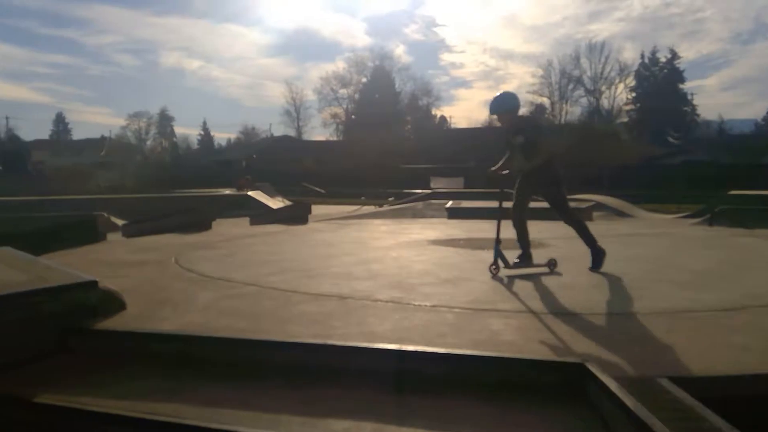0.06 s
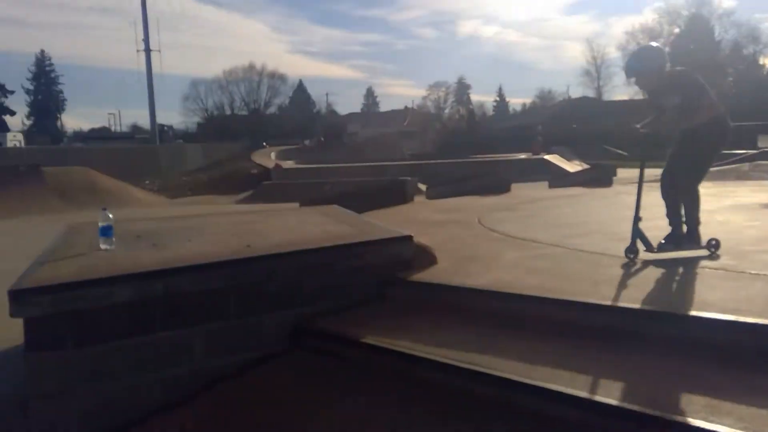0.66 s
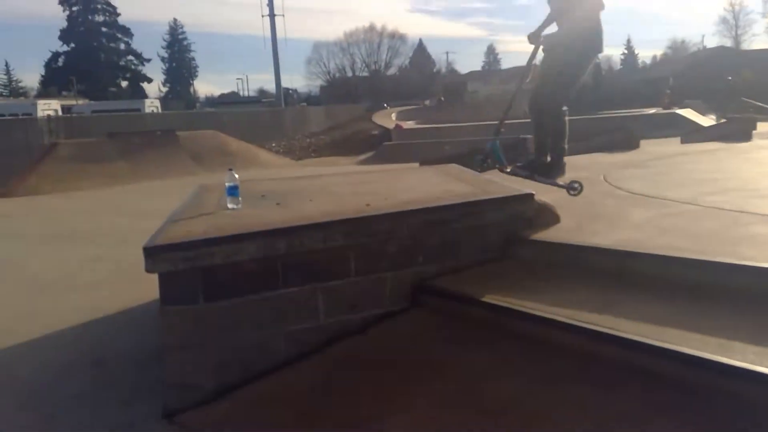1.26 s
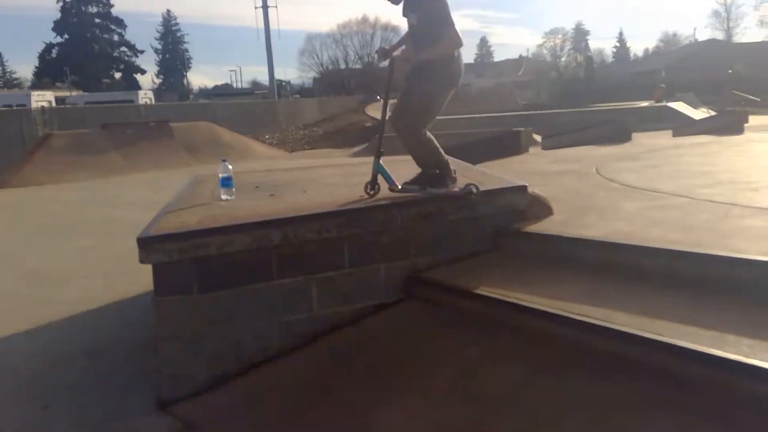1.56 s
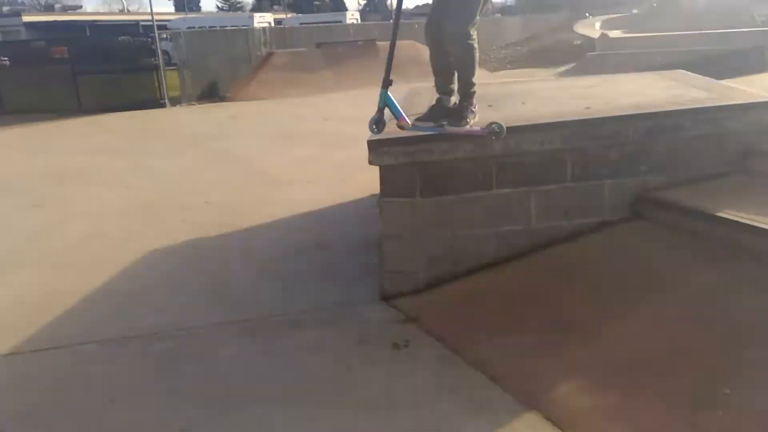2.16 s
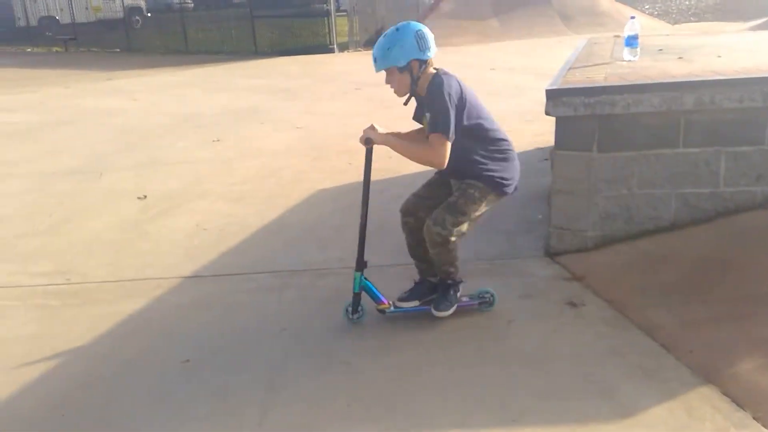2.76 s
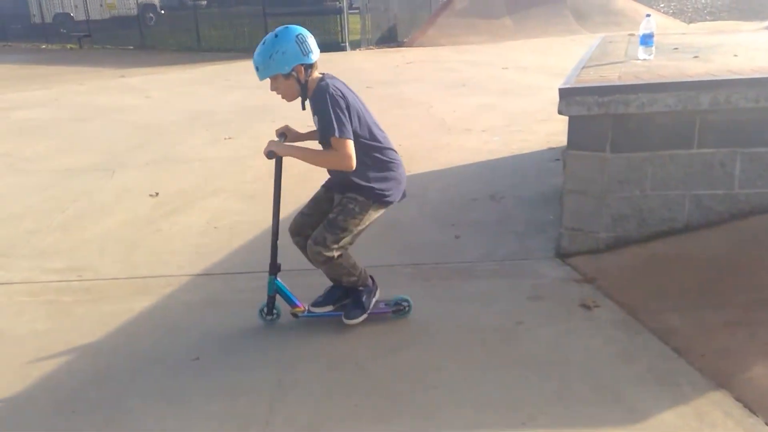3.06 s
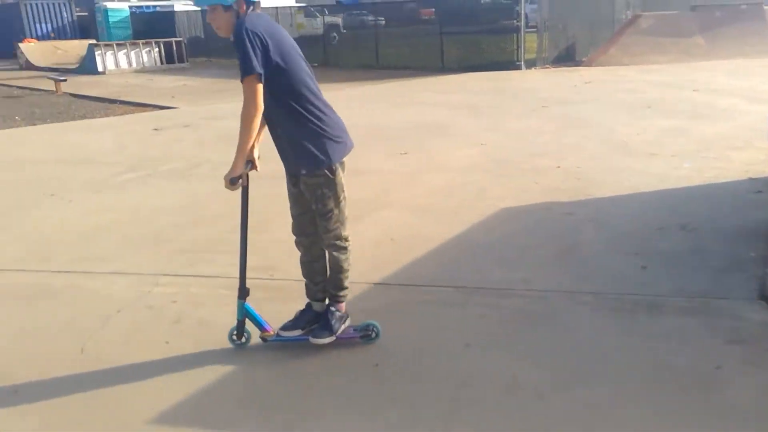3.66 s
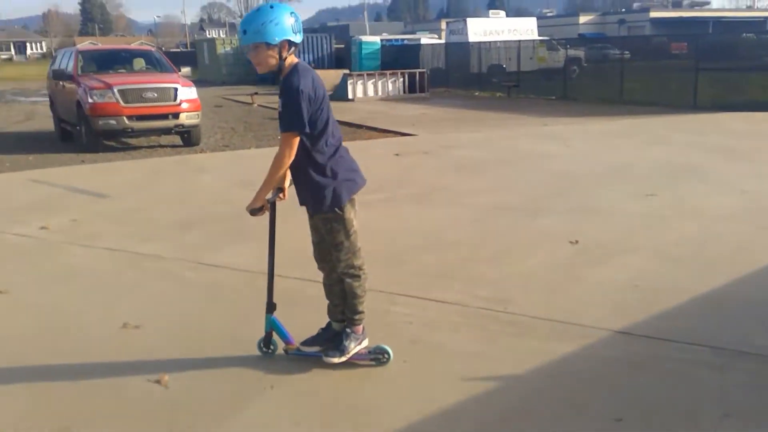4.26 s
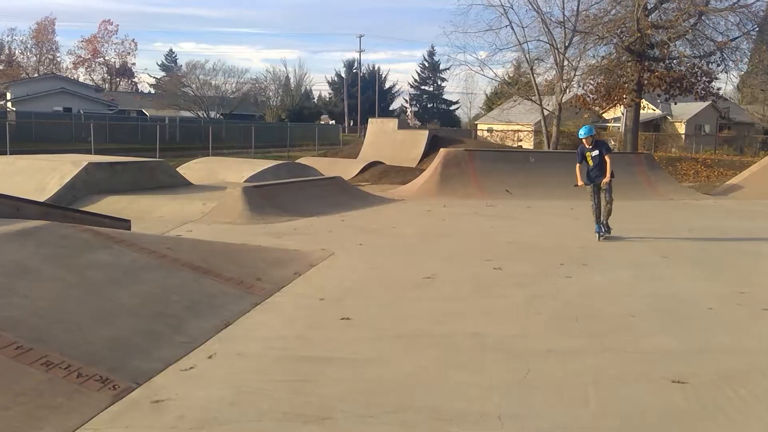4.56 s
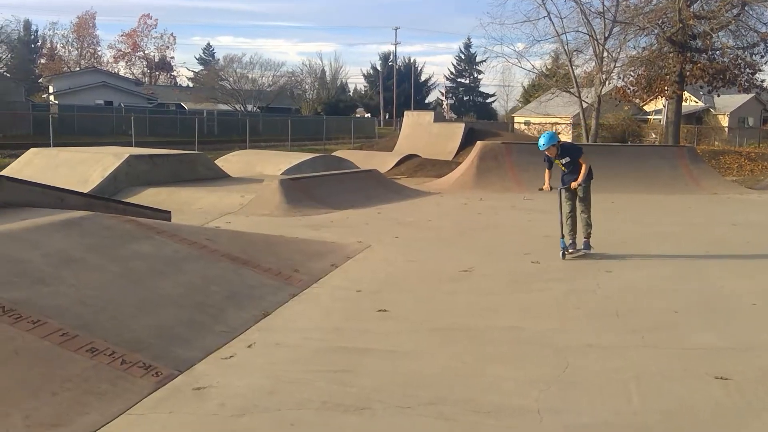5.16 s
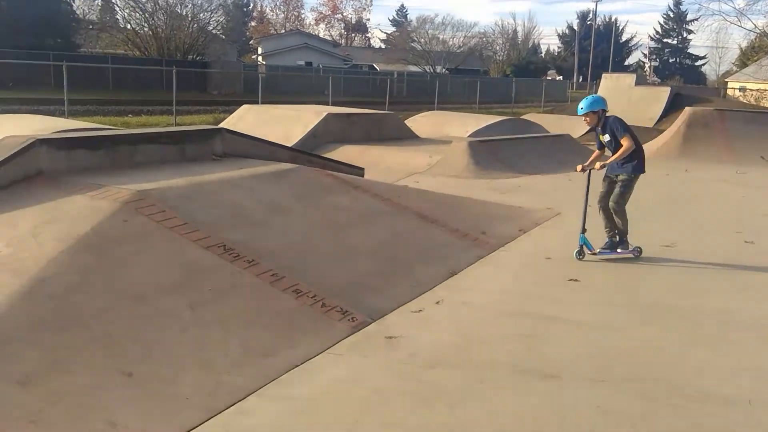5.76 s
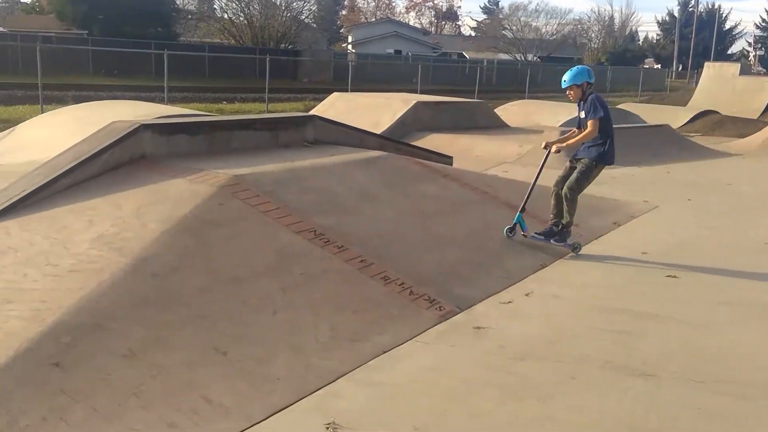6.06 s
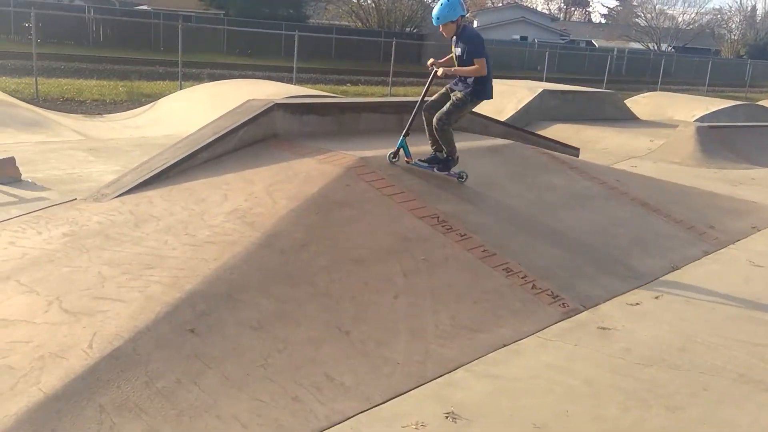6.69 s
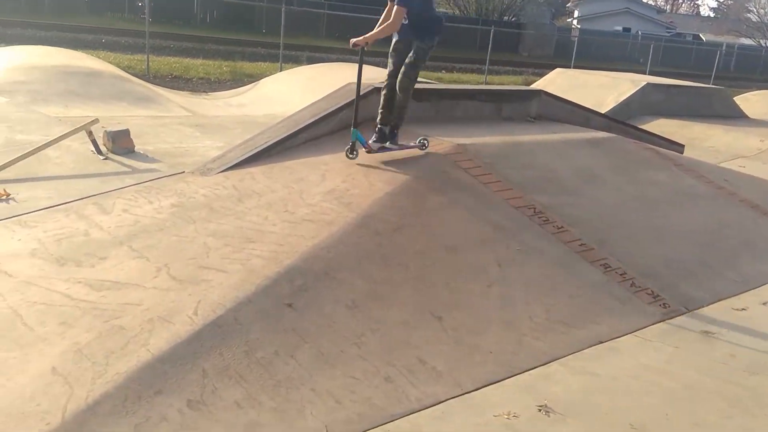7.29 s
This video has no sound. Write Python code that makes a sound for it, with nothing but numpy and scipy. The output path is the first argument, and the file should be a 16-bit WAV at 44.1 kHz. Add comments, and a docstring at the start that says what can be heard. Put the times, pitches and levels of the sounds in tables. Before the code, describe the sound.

A kick scooter rolls over concrete, knocks onto a ledge and grinds along it with a brief raspy squeal. It lands hard, its metal frame ringing, and rolls off. After a short silence it comes back, clacks up a bank and whirrs as it spins in the air. A few faint birds, a low rumble and a thin high whine lie behind, picked up by a phone microphone with short outdoor echoes.

```python
"""A kick scooter hops onto a concrete ledge, grinds along it, lands hard and rolls off. Then the sound breaks
off into a short silence and fades back in as the scooter clacks up a bank and is spun in the air. Wheels thud
under the rider's weight, bare metal clacks and rings, and sliding shakes the deck (the board you stand on).
Ramps and fences echo the scooter and a few faint birds. Behind it all lie a low outdoor rumble, the roar of a
distant town and a thin, high whine."""
import sys
import numpy as np
from scipy import signal
from scipy.fft import rfft, irfft, next_fast_len
from scipy.io import wavfile
from scipy.ndimage import uniform_filter1d, map_coordinates

SR = 44100
rng = np.random.default_rng(int(sys.argv[2]) if len(sys.argv) > 2 else 0)


def generate_wav(signal):
    """Clip the signal to [-1, 1] and save it as 16-bit WAV at the path in sys.argv[1]."""
    frames = np.transpose(np.atleast_2d(signal))
    scaled = np.clip(frames, -1, 1) * 32767
    pcm = np.round(scaled).astype(np.int16)
    wavfile.write(sys.argv[1], SR, pcm)


N = 323253
TIME = np.arange(N) / SR
SIDES = np.array([[1], [-1]])  # left, right
PAUSE_START_S, PAUSE_END_S = 4.403, 4.799  # the silence between the two runs


def amp(db):
    """Turns decibels into a number to multiply by."""
    return 10 ** (np.asarray(db) / 20)


def unit_level(x):
    """Scales x to an average (rms) level of 1."""
    return x / np.sqrt(np.mean(x ** 2) + 1e-20)


def at_pitch(points, hz):
    """Looks up a value between the pitches of a table."""
    pitches, values = np.transpose(points)
    return np.interp(np.log(hz + 1), np.log(pitches), values)


def band(x, low_hz, high_hz, order=3):
    """Keeps the sound between two pitches."""
    return signal.sosfilt(signal.butter(order, [low_hz, high_hz], "band", fs=SR, output="sos"), x)


def coloured(x, points):
    """Makes each pitch louder or softer, as a table says."""
    size = next_fast_len(N)
    gain = amp(at_pitch(points, np.fft.rfftfreq(size, 1 / SR)))
    return irfft(rfft(x, size) * gain, size)[:, :N]


def drift(size, rate_hz):
    """A smooth random wobble."""
    knots = rng.standard_normal(4096)
    return unit_level(map_coordinates(knots, [np.arange(size) * rate_hz / SR], order=2, mode="wrap"))


def burst(t, rise_s, decay_s):
    """The loudness of one hit: quickly up, then dying away."""
    return (1 - np.exp(-(t / rise_s) ** 2)) * np.exp(-t / decay_s)


def add(mix, start_s, sound):
    """Mixes in a stereo sound."""
    part = mix[:, round(start_s * SR):][:, :sound.shape[1]]
    part += sound[:, :part.shape[1]]


def place(x, left_db, shadow_hz=950, scatter_db=-11):
    """Puts a sound left or right: the far side of the phone hears it duller and later."""
    size = next_fast_len(len(x) + 192)
    hz = np.fft.rfftfreq(size, 1 / SR)
    treble = hz ** 2 / (hz ** 2 + shadow_hz ** 2)
    gain = amp(SIDES * left_db / 2 * treble)
    gain /= np.sqrt(np.mean(gain ** 2, 0))
    detour = 1 + 1.5 / (1 + (hz / 700) ** 2)  # low sounds bend round the phone, a longer way
    lag_samples = 16 - SIDES * np.clip(1.55 * left_db, -4, 4) / 2 * detour
    hand_scatter = amp(scatter_db) * treble * rfft(rng.standard_normal((2, 100)) / 10, size)
    paths = (1 + hand_scatter) * np.exp(-2j * np.pi * hz * lag_samples / SR)
    return irfft(rfft(x, size) * gain * paths, size)


# The tone of the rumble and of the roar: pitch_hz, level_db
RUMBLE_TONE = [(12, -38), (20, -9), (38, -1), (65, 2.5), (97, -6.5), (124, -4), (150, -11.5), (189, -14),
               (300, -24), (390, -54), (660, -120)]
ROAR_TONE = [(120, -12), (250, -3), (400, -0.5), (650, 1.5), (1000, -5), (1700, -8), (2500, -15),
             (4500, -25.5), (8000, -28.5), (15000, -25)]
# Stretches of rolling: start_s, end_s, lift_db
ROLLS = [(0.51, 0.785, 8), (1.272, 2.3, 15), (2.732, 2.823, 10), (4.9, 7.33, 6), (5.2, 5.355, 9.5),
         (5.72, 5.98, 11.5), (6.734, 7.12, 19)]
def air_and_rolling(rumble_db=-59, roar_db=-68, rise_db_per_s=110, fall_db_per_s=63):
    """A lumpy rumble and the wider roar of town and wheels; both swell while the wheels roll."""
    lift_db = np.zeros(N)
    for start_s, end_s, db in ROLLS:
        before_db = rise_db_per_s * np.maximum(start_s - TIME, 0)
        after_db = fall_db_per_s * np.maximum(TIME - end_s, 0)
        lift_db = np.maximum(lift_db, db - before_db - after_db)
    rumble_middle, rumble_side, roar_middle, roar_side = rng.standard_normal((4, N))
    rumble = unit_level(coloured(rumble_middle + 0.4 * SIDES * rumble_side, RUMBLE_TONE))
    rumble *= amp(rumble_db + 0.27 * lift_db + 1.6 * drift(N, 9.3))
    roar = unit_level(coloured(roar_middle + 0.67 * SIDES * roar_side, ROAR_TONE))
    roar *= amp(roar_db + 0.88 * drift(N, 40))
    wheels = band(roar[:, ::-1], 200, 3000, order=1) * np.sqrt(amp(lift_db) ** 2 - 1)
    fade_in_db = 71.5 * np.minimum(TIME - 5.026, 0) * (TIME > PAUSE_START_S + .1)  # after the pause
    return (rumble + roar + wheels) * amp(fade_in_db)


# How loud the whine is: time_s, level_db
WHINE_LEVELS = [(0, -93.5), (2.9, -91.5), (3.4, -76), (4.4, -74.5), (4.8, -105), (6.6, -84.5), (7.33, -89)]
def whine(rest_hz=10980, top_hz=11375, slide_hz_per_s=760, peaks_s=(3.15, 4.6, 6.75)):
    """A faint high tone that now and then climbs and slides back."""
    from_peak_s = np.min([abs(TIME - s) for s in peaks_s], 0)
    hz = np.maximum(top_hz - slide_hz_per_s * from_peak_s, rest_hz)
    level_db = np.interp(TIME, *np.transpose(WHINE_LEVELS))
    return np.sqrt(2) * amp(level_db) * np.sin(2 * np.pi * np.cumsum(hz) / SR)


# The scooter's path (below zero is to the right): time_s, left_db
PATH = [(.5, -6), (1.75, -1), (1.9, -19), (2.15, -18.5), (2.3, -14.5), (2.8, -5.5), (4.3, 2.5), (5.3, -1),
        (5.8, -13), (6.2, -4), (6.68, 17), (6.85, 14), (7.2, 20.5)]
def scooter_side(time_s):
    """How far to the left the scooter sounds."""
    return np.interp(time_s, *np.transpose(PATH))


# The notes of the deck pressed on the ledge: pitch_hz, width_hz, level_db
DECK_NOTES = [(600, 150, 6), (1126, 51, -11.5), (1570, 390, -11.5), (1690, 420, -12.5), (2020, 130, -9.5),
              (2720, 230, -13.5), (3120, 340, -16), (3666, 350, -19.5), (4220, 200, -19),
              (5504, 190, -22.5), (7100, 370, -22), (8320, 240, -21), (9270, 120, -17.5), (10280, 150, -19),
              (12700, 440, -22)]
def through_deck(x, direct_db=-28):
    """The deck boosts its own notes and lets a little sound straight through."""
    hz = np.fft.rfftfreq(len(x), 1 / SR)
    notes = sum(amp(db) / (1 + 2j * (hz - pitch) / width) for pitch, width, db in DECK_NOTES)
    return irfft(rfft(x) * (amp(direct_db) + notes), len(x))


# The borders of a hit's five ranges (thud, knock, clank, crack, fizz): edge_hz
HIT_EDGES = [90, 300, 800, 2500, 6000, 15500]
def hit(start_s, levels_db, notes_hz, decay_s, clank_share, rise_s=0.0014, lead_s=.02):
    """One impact: three dying notes under a hollow clatter that dies faster in the treble."""
    clock = np.arange(SR // 5) / SR - lead_s
    t = np.maximum(clock, 0)
    level_scale = np.sqrt(.02 * SR / len(t))  # levels count as if the hit lasted 20 ms
    squeeze = amp(-18) * np.exp(-abs(clock) / .0027)  # the tyre gives before the hard contact
    chatter = amp(-26) * burst(t, rise_s, 0.017)  # loose steering parts and bearings
    rises_s = [2 * rise_s, rise_s, rise_s, 0.00044, 0.00044]
    decays_s = decay_s * np.array([1, 1.3, 1, 0.94, 0.94])
    note_shares = [0.94, 0.741, clank_share]
    out = np.zeros(len(t))
    for k, level_db in enumerate(levels_db):
        shape = squeeze + burst(t, rises_s[k], decays_s[k])
        clatter = rng.standard_normal(len(t)) * (shape + chatter)
        if k >= 2:  # clank, crack and fizz sound hollow
            clatter = through_deck(clatter, direct_db=-15.5 if k == 2 else -23)
        part = unit_level(band(clatter, *HIT_EDGES[k:k + 2], order=5 if k >= 2 else 3))
        if k < 3:  # thud, knock and clank each hold a note
            note = unit_level(shape * np.sin(2 * np.pi * notes_hz[k] * clock))
            noise = unit_level(part - note * np.mean(part * note))
            part = np.sqrt(note_shares[k]) * note + np.sqrt(1 - note_shares[k]) * noise
        out += amp(level_db) * level_scale * unit_level(part)
    return start_s - lead_s, place(out, scooter_side(start_s))


# Deck and fork clacking: start_s, strength_db, hardness_db, clank_hz, decay_s,
# clank_share (0 is all noise, 1 is a clear note)
CLACKS = [(0.524, -30.5, -14.5, 1765, 0.0012, 0), (1.524, -36.5, -13, 1026, 0.00375, 0.87),
          (1.584, -45, 8, 1850, 0.0082, 0.21), (2.082, -42, -3.5, 2210, .009, .8),
          (2.1516, -36, 2.5, 2070, .013, .55), (2.2377, -17.5, 2, 1851, 0.0046, .3),
          (5.8001, -33.5, 10, 1907, 0.0089, 0.96), (6.27, -64, 10.5, 1847, 0.0059, 0.22),
          (7.071, -42.5, 12, 2430, 0.0074, 0.51), (7.174, -36.5, 2.5, 968, 0.0107, 0.75)]
def metal_clack(start_s, strength_db, hardness_db, clank_hz, decay_s, clank_share):
    """Bare metal hits with little weight behind it; harder hits have more crack and fizz."""
    tone_db = np.array([-20, -11, 0, -8, -17.5]) + hardness_db * np.array([0, 0, 0, 0.34, 1.4])
    return hit(start_s, strength_db + tone_db, (230, 697, clank_hz), decay_s, clank_share)


# Dull knocks and thumps (wheel strikes, shoe thumps and judders in the grind):
# start_s, strength_db, weight_db, hardness_db, thud_hz, knock_hz, clank_hz, decay_s
KNOCKS = [(0.717, -54, 11, -31, 137, 590, 823, 0.069), (0.9409, -59.5, 38.5, 7.5, 207, 349, 2370, .007),
          (1.236, -24.5, -16, 1.5, 227, 594.3, 1540, 0.0024),
          (1.2449, -32.5, -2.5, 4, 184, 623, 1690, .0094), (1.267, -30.5, -10, -5.5, 139, 604, 1170, .0099),
          (1.445, -17, -6.5, 3, 138.3, 603, 1700, 0.0047), (1.4702, -19, 0, 10.5, 233, 590, 896.7, 0.0024),
          (1.6507, -42.5, -3, -19, 266, 645.4, 2121, 0.026), (1.741, -41, -9, -19, 270, 593.8, 2083, .012),
          (1.7565, -30.5, -13.5, -42, 281, 593.2, 2097, 0.0057),
          (1.8036, -25.5, -14, -11, 208, 601, 1536, 0.0075),
          (2.2388, -32, -12, 5.5, 185, 767.8, 1000, .009), (2.678, -38.5, 9.5, 6.5, 187, 493, 1594, 0.023),
          (2.6959, -19, 9.5, -7.5, 227, 343, 806, 0.0044),
          (2.7012, -16.5, 5.5, 12.5, 166.1, 484, 1550, 0.00724),
          (2.7267, -27.5, 6.5, 6.5, 150, 457, 928, 0.0059),
          (2.7633, -35, -6, -5.5, 144.7, 488.4, 1127, .005),
          (4.3024, -31, 0.5, -23, 244, 560, 1118, 0.00471), (5.122, -58.5, 7, -7, 281, 335.6, 886, 0.013),
          (5.322, -56.5, 10, 4, 131, 775, 820, 0.0059),
          (6.1583, -16.5, -0.5, 0.5, 247, 479.5, 1128, 0.00325),
          (6.6874, -22, -3, -4.5, 283, 508.7, 1125, 0.0096), (6.7917, -13, -10, -6, 300, 401, 1010, 0.0025),
          (6.818, -32, 1, -7, 223.4, 358.6, 803, 0.029), (6.957, -32.5, 15, 10, 210, 518, 1575, 0.01)]
def dull_knock(start_s, strength_db, weight_db, hardness_db, thud_hz, knock_hz, clank_hz, decay_s):
    """The rider's weight feeds the thud; a hard contact feeds the treble."""
    tone_db = np.array([-9, -2, -3, -14, -27]) + hardness_db * np.array([0, 0, 0.55, 1, 1.4])
    tone_db[0] += weight_db
    return hit(start_s, strength_db + tone_db, (thud_hz, knock_hz, clank_hz), decay_s, clank_share=0.52)


# Bird notes: start_s, length_s, first_hz, last_hz, level_db, rasp (0 to 1)
BIRD_NOTES = [(1.067, 0.0901, 2176, 2070, -57, 0.6), (1.082, 0.044, 2495, 2565, -53, 0.38),
              (1.105, 0.075, 4430, 5014, -69.5, 1), (3.845, 0.072, 3354, 3360, -77, 0),
              (4.79, 0.057, 2126, 2068, -70.5, 0.27), (5.06, 0.083, 2637, 3280, -75, 0.3),
              (6.541, .12, 3071, 3002, -64.5, 0.08), (7.238, 0.085, 5800, 6000, -83, 0.29)]
def chirp(start_s, length_s, first_hz, last_hz, level_db, rasp, left_db=-2):
    """A gliding whistle; a fluttering pitch makes it raspy."""
    size = int(length_s * SR)
    hz = np.linspace(first_hz, last_hz, size) * (1 + 0.029 * rasp * drift(size, 650))
    whistle = np.hanning(size) * np.sin(2 * np.pi * np.cumsum(hz) / SR)
    return start_s, place(amp(level_db) * unit_level(whistle), left_db)


def grit(size, spread_db=2.5, grain_hz=700):
    """Noise that catches and slips on the grain of the concrete."""
    return rng.standard_normal(size) * amp(spread_db * drift(size, grain_hz))


def wander(x, spread_db=5):
    """As the contact point slides, different notes come and go."""
    spectrum = signal.stft(x, nperseg=512)[2]
    blur = np.outer(np.hanning(5), np.hanning(25))
    patches = unit_level(signal.convolve2d(rng.standard_normal(spectrum.shape), blur, "same"))
    return signal.istft(spectrum * amp(spread_db * patches), nperseg=512)[1][:len(x)]


# The grind, the rattle after landing, the wheels coming back, the whirr on the bank and in the air:
# start_s, peak_s, end_s, groan_db, rasp_db, hiss_db, rise_db_per_s, fall_db_per_s
RUBS = [(1.5, 1.88, 2.235, -52, -55.5, -57, 48, -4.5), (2.766, 2.782, 3.0, -60, -51, -86.5, 11.5, 94),
        (5.047, 5.243, 6.1, -77, -73, -78, 58, -1.5), (6.705, 6.923, 7.33, -44.5, -53, -53, 109, 53.5)]
def rub(start_s, peak_s, end_s, groan_db, rasp_db, hiss_db, rise_db_per_s, fall_db_per_s):
    """Sliding metal and spinning wheels shake the deck: the groan starts at once, the hiss builds."""
    t = np.arange(start_s, end_s, 1 / SR)
    before_db = rise_db_per_s * np.maximum(peak_s - t, 0)
    after_db = fall_db_per_s * np.maximum(t - peak_s, 0)
    judder = amp(1.47 * drift(len(t), 66))
    scrape = wander(through_deck(grit(len(t)) * judder))
    groan = unit_level(band(scrape, 400, 1400)) * amp(groan_db - 0.5 - .02 * before_db - .88 * after_db)
    rasp = unit_level(band(scrape, 1400, 5000)) * amp(rasp_db + 3 - .3 * before_db - .95 * after_db)
    hiss = unit_level(band(scrape, 5000, 15500)) * amp(hiss_db + 5.5 - 1.02 * before_db - .93 * after_db)
    out = (groan + rasp + hiss) * signal.windows.tukey(len(t), .05)
    return start_s, place(out, np.mean(scooter_side(t)))


# One squeal: start_s, length_s, first_hz, last_hz, level_db, rasp (0 to 1), left_db
SQUEAL = (2, 0.1, 2182.5, 1897, -43.5, 0.8, -6)
def deck_squeal():
    """The deck gives a falling, raspy whistle near the end of the ledge."""
    return chirp(*SQUEAL)


# Short gritty scrapes, rattles and hisses of the scooter: start_s, length_s, level_db, low_hz, high_hz
SCRAPES = [(2.074, 0.097, -46, 1690, 2961), (2.146, .093, -43, 1750, 4600),
           (2.199, 0.064, -33, 1610, 13900), (2.568, 0.0566, -47, 4180, 14000),
           (2.69, 0.013, -38, 3500, 15300), (2.79, 0.073, -48, 980, 5970), (2.921, 0.061, -54, 1005, 3600),
           (4.31, 0.093, -54.5, 300, 1250), (5.201, 0.0549, -62, 1900, 15160),
           (5.742, 0.032, -56.5, 9240, 15800), (5.919, 0.039, -49.5, 1970, 14100),
           (5.964, 0.047, -57, 1920, 14200), (6.982, 0.01, -45, 2980, 15600),
           (7.04, 0.0298, -47, 2630, 3200)]
def short_scrape(start_s, length_s, level_db, low_hz, high_hz):
    """A short swell of gritty noise through the deck."""
    size = int(length_s * SR)
    scrape = wander(through_deck(grit(SR // 3)))
    swell = band(scrape, low_hz, high_hz, order=4)[:size] * signal.windows.tukey(size, .7)
    return start_s, place(amp(level_db) * unit_level(swell), scooter_side(start_s))


# The frame's own notes: pitch_hz, level_db, ring_s (time to fade by 60 dB)
FRAME_NOTES = [(1085, -17, .45), (2050, -7, 0.23), (3020, -16.5, .45), (3705, -19.5, 0.4), (4225, 0, 0.49),
               (4312, 1.5, 0.38), (5426, -6.5, .18), (7400, -22, .2)]
def frame_ring(start_s=2.7014, level_db=-31, rise_s=.0014):
    """The hard landing sets the frame ringing."""
    t = np.arange(SR * 3 // 4) / SR
    ring = sum(amp(db - 60 * t / ring_s) * np.sin(2 * np.pi * (hz * t + rng.random()))
               for hz, db, ring_s in FRAME_NOTES)
    return start_s, place(amp(level_db) * ring * (1 - np.exp(-t / rise_s)), scooter_side(start_s))


# How long the echoes last: pitch_hz, ring_s
ECHO_TIMES = [(100, 0.24), (500, 0.12), (1500, 0.3437), (4000, 0.22), (12000, 0.0462)]
# How loud they are: pitch_hz, level_db
ECHO_LEVELS = [(100, -35), (300, -21.5), (700, -12.5), (1600, -17), (2600, -25), (6000, -23),
               (14000, -26.5)]
def park_echoes(x, build_s=0.0032):
    """Sound bounces off ramps and fences, each pitch dying at its own speed."""
    bounces = rng.standard_normal((2, SR)) * (rng.random((2, SR)) < .08)
    hz, t, spectrum = signal.stft(bounces, SR, nperseg=256)
    fade = amp(-60 * t / at_pitch(ECHO_TIMES, hz)[:, None]) * (1 - np.exp(-(t / build_s) ** 2))
    fade *= amp(at_pitch(ECHO_LEVELS, hz))[:, None] / np.sqrt(np.mean(fade ** 2, 1, keepdims=True))
    tail = signal.istft(spectrum * fade, SR, nperseg=256)[1] / np.linalg.norm(bounces[0])
    blended_sides = 0.62 * x + 0.36 * x[::-1]
    return signal.fftconvolve(blended_sides, tail[:, :SR * 3 // 4], axes=1)[:, :N]


def scene():
    """The scooter and birds with their echoes, over the open air."""
    background = air_and_rolling() + whine()
    near = np.zeros((2, N))
    for play, table in [(metal_clack, CLACKS), (dull_knock, KNOCKS), (chirp, BIRD_NOTES),
                        (rub, RUBS), (short_scrape, SCRAPES)]:
        for row in table:
            add(near, *play(*row))
    add(near, *deck_squeal())
    add(near, *frame_ring())
    return background + near + park_echoes(near)


# The tone of the phone's microphones: pitch_hz, gain_db
MIC_TONE = [(20, 1), (600, 1), (780, -2.5), (1000, -0.5), (1600, -2.5), (2600, -1.5), (4200, 0.5),
            (6500, 3.5), (8000, 2), (10000, -4.5), (12500, -3), (16000, -7)]
def record(dry, pop_s=4.707, pop_db=-46, top_hz=16000):
    """Colours the sound, silences the pause but for one soft pop, and trims peaks and top treble."""
    sound_on = 1. * ((TIME < PAUSE_START_S) | (TIME > PAUSE_END_S))
    out = coloured(dry, MIC_TONE) * uniform_filter1d(sound_on, size=400)
    pop = amp(pop_db) * burst(TIME[:SR // 50], rise_s=0.00011, decay_s=0.0021)
    add(out, pop_s, np.tile(pop, (2, 1)))
    treble_cut = signal.firwin(511, top_hz, window=("kaiser", 9), fs=SR)
    return signal.oaconvolve(np.clip(out, -1, 1), treble_cut[None], "same")


dry = scene()
out = record(dry)
generate_wav(out)
```